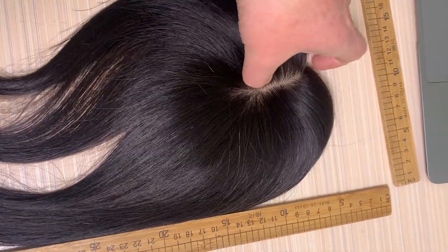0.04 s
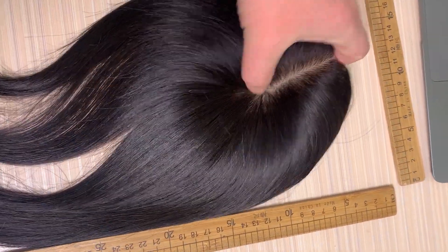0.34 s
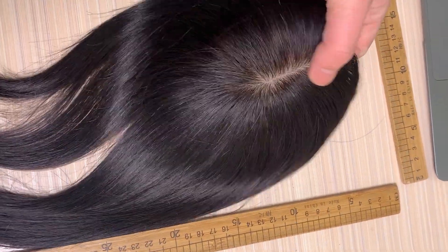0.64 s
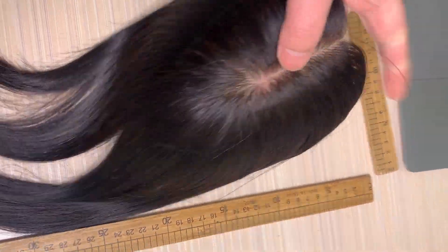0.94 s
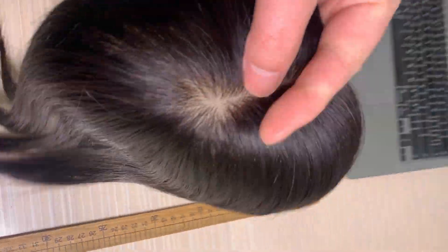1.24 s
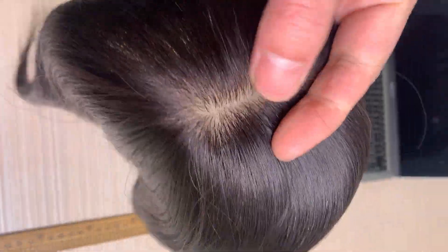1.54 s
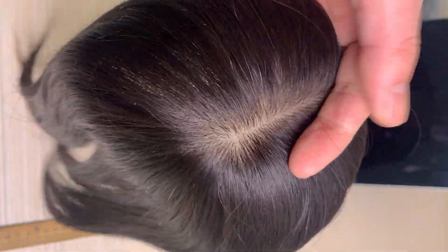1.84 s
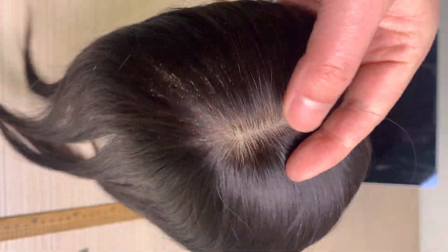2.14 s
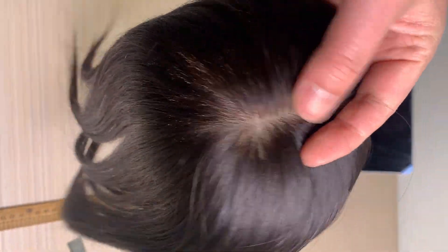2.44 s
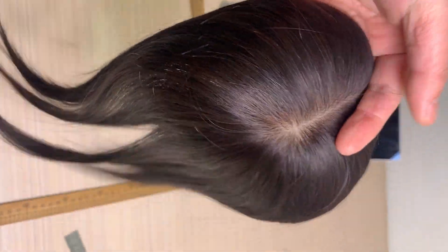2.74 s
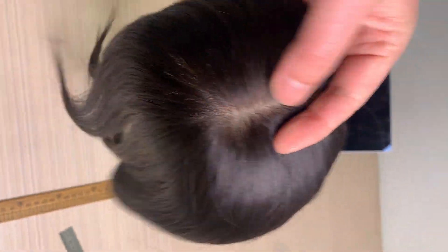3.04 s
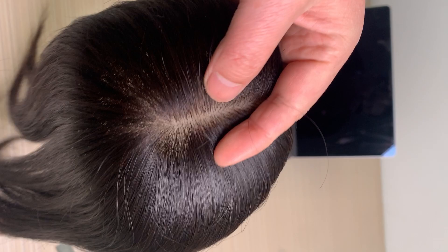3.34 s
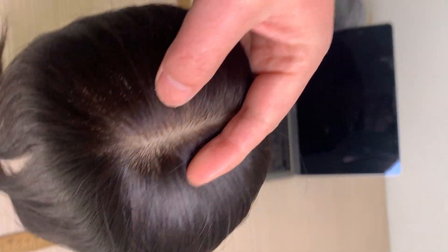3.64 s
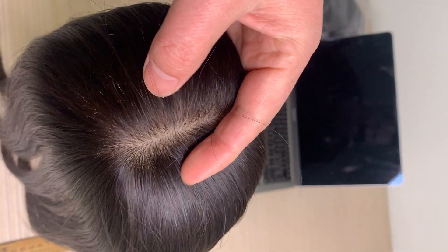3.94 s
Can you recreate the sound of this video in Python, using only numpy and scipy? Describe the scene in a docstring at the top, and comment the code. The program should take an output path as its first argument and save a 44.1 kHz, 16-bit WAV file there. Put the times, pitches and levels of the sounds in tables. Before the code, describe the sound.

A hair piece rustles softly close to the microphone over low room rumble. Its stiff cap scuffs and taps off a desk in the first 0.4 seconds. Strands then slide with a faint swish, tiny ticks and a fine hiss on the left, strongest near 2.4 seconds. Dull handling bumps on the microphone recur throughout, clustering around 2.9 seconds, and one clear, low knock lands at 3.7 seconds.

```python
"""A hair piece handled close to the stereo microphones of a hand-held camera in a quiet room.
First its stiff cap scuffs and taps as it is lifted off a desk. Then it is turned in one hand: the
strands slide with a soft swish and a fine sheen on the left, and a few snap faintly. The swish is
strongest near 2.4 s. The hand that holds the camera bumps the case softly along the way,
and knocks it once clearly at 3.7 s."""
import sys
import numpy as np
from scipy import signal
from scipy.fft import rfft, irfft
from scipy.io import wavfile
from scipy.ndimage import uniform_filter1d

SR = 44100
rng = np.random.default_rng(int(sys.argv[2]) if len(sys.argv) > 2 else 0)


def wav_record(signal):
    """Record a signal, one row per channel, as 16-bit PCM in the file named by sys.argv[1]."""
    frames = np.transpose(np.atleast_2d(signal))
    bounded = np.clip(frames, -1, 1)
    # unit amplitude maps onto the largest positive 16-bit level
    quanta = np.round(bounded * 32767).astype(np.int16)
    wavfile.write(sys.argv[1], SR, quanta)


N = 176400

# strands sliding close to the microphones (time [s], relative level [dB])
SWISH_LEVEL = [(0, -85), (.25, -85), (.37, -80.5), (.48, -77), (.65, -77), (.71, -89), (.82, -83),
               (.96, -74), (1.1, -75), (1.35, -73.5), (1.55, -75), (1.7, -76), (2.0, -78), (2.2, -80),
               (2.38, -68), (2.47, -75.5), (2.56, -77), (2.75, -88.5), (2.93, -88), (3.02, -89),
               (3.15, -81.5), (3.21, -77.5), (3.35, -82.5), (3.7, -82), (3.86, -75), (4, -81.5)]
# their soft swish (frequency [Hz], gain [dB])
SWISH_SPECTRUM = [(100, -19), (500, 6), (1000, 4.5), (1450, 2), (1950, 2), (2500, -2.5), (3600, -10.5),
                  (5000, -18), (7000, -18), (9000, -27), (12000, -21), (16000, -27)]
# quick strokes of the hair (time [s], relative level [dB])
STROKE_LEVEL = [(0, -100), (.25, -95), (.3, -78.5), (.4, -96), (.64, -77.5), (.71, -100), (.97, -80.5),
                (1.15, -80.5), (1.35, -76), (1.55, -77.5), (1.7, -91), (2.2, -90.5), (2.3, -82),
                (2.38, -71), (2.47, -80), (2.56, -88), (2.92, -100), (3.0, -83.5), (3.25, -84.5),
                (3.7, -81.5), (4, -99)]
# their brighter swish (frequency [Hz], gain [dB])
STROKE_SPECTRUM = [(100, -18), (1500, -6), (2800, 2), (3700, 3), (4800, -3.5), (5500, -11.5), (6400, -9),
                   (7500, -37), (16000, -30)]
# hair nearest the left microphone (time [s], relative level [dB])
SHEEN_LEVEL = [(0.0, -83), (0.05, -96), (0.24, -94), (0.27, -82.5), (0.38, -84.5), (0.65, -76.5),
               (0.73, -90), (1.02, -73.5), (1.38, -78), (1.79, -76.5), (1.85, -82), (2.64, -84),
               (2.71, -95), (2.81, -88), (2.86, -92), (3.15, -77), (3.3, -82.5), (3.31, -87), (3.32, -79.5),
               (3.75, -77.5), (3.79, -88), (4.0, -88)]
# its fine hiss (frequency [Hz], gain [dB])
SHEEN_SPECTRUM = [(20, -72), (7750, -50), (8030, 6), (8600, 2.5), (10000, -2), (11000, -9), (12000, -27),
                  (15000, -31)]
# a fingertip across the strands (time [s], length [s], level [dB])
FINGER_DRAGS = [(0.427, 0.11, -76.5), (.93, 0.15, -77), (1.058, 0.13, -75.5), (3.17, 0.088, -75.5),
                (3.317, 0.059, -76)]
# its coarse scrape (frequency [Hz], gain [dB])
DRAG_SPECTRUM = [(100, -30), (800, -20), (1150, 1), (1500, -7), (1900, 1), (2600, -2), (3400, -13),
                 (6000, -21), (16000, -43)]
# strands snapping (time [s], peak [dB], centre [Hz], width [octaves], decay [s], left minus right [dB])
STRAND_SNAPS = [(0.2718, -61.5, 4900, 0.16, 0.0036, -5), (.284, -67, 5100, 0.2, .004, 0),
                (.275, -66, 10000, .35, .012, 2), (1.3214, -63, 5040, 0.17, 0.004, -7),
                (1.334, -70, 5200, .16, .004, -9), (1.672, -63.5, 9500, 0.19, .005, 11),
                (2.368, -67, 4840, 0.13, .008, -14), (2.4502, -46.5, 1250, .36, .0025, 1),
                (3.1712, -53.5, 1920, 0.27, 0.0032, 1), (3.1714, -63, 4200, 0.67, 0.0033, -2),
                (3.3107, -62, 9500, .2, .004, 9), (3.3618, -63, 4000, 1, 0.003, 2),
                (3.407, -63, 4000, 0.99, 0.0023, 4), (3.708, -61, 4850, 0.67, 0.016, 4)]

# the hand rubbing the cap of the hair piece (time [s], relative level [dB])
RUB_LEVEL = [(0, -69.5), (.31, -77.5), (.37, -65), (.46, -84), (.7, -85.5), (.85, -70), (1.05, -68.5),
             (1.31, -63.5), (1.45, -67), (1.55, -78), (1.83, -62.5), (2.05, -67), (2.26, -63), (2.5, -65.5),
             (2.7, -76), (2.86, -81.5), (3.02, -68.5), (3.12, -81), (3.22, -72), (3.38, -70.5),
             (3.58, -83.5), (3.8, -72), (4, -72.5)]
# its dull rustle (frequency [Hz], gain [dB])
RUB_SPECTRUM = [(30, -25), (120, -5.5), (235, -6), (290, 3), (335, 2.5), (380, -4.5), (480, -10),
                (620, -11.5), (730, -13), (860, -16.5), (1100, -20.5), (1600, -29), (4000, -66),
                (16000, -86)]
# the cap scuffing on the desk and in the hand (time [s], level [dB], decay [s])
CAP_SCUFFS = [(0.033, -60, 0.013), (0.1056, -52.5, 0.017), (0.138, -55, 0.032), (.339, -58, 0.024),
              (2.378, -59, .06)]
# its hollow scrape (frequency [Hz], gain [dB])
SCUFF_SPECTRUM = [(40, -15), (200, 4), (360, -1.5), (460, -14), (560, 0.5), (630, -3.5), (705, 7.5),
                  (850, -14), (980, -11), (1300, -19.5), (1800, -18.5), (2500, -27), (5000, -39),
                  (16000, -56)]
# the cap tapping desk and fingers (time [s], relative level [dB], upper edge [Hz])
CAP_TAPS = [(0.048, -55.5, 1000), (.065, -52, 680), (.2735, -54.5, 1900), (.284, -57.5, 1300),
            (1.322, -54.5, 1000), (2.896, -61, 800), (2.972, -41.5, 580)]
# resonances of the cap (frequency [Hz], gain [dB], decay [s])
CAP_RESONANCES = [(560, 0.5, 0.004), (690, -2.5, 0.0043), (950, -4, .003), (1840, -8, .002)]

# the hand bumping the camera case (time [s], peak [dB], upper edge [Hz], tilt [dB per octave])
CASE_BUMPS = [(0.0512, -40, 390, 1.5), (0.1388, -45.5, 201, 3.5), (0.154, -49, 130, -9.5),
              (0.214, -46, 296, -1.5), (0.272, -55, 200, -3), (0.337, -45, 500, 0.5),
              (0.413, -52.5, 200, -1), (0.487, -50.5, 218, 1.5), (0.6, -49, 200, -0.5),
              (.745, -55.5, 220, 0), (0.858, -51, 120, -6), (0.969, -50.5, 110, -11), (1.21, -50, 120, -5),
              (1.331, -42.5, 130, -9), (1.465, -53, 100, -5), (1.571, -43.5, 190, -3),
              (1.6885, -42, 180, -1.5), (1.925, -43, 300, -2), (1.947, -47, 110, 2),
              (2.1867, -48.5, 99, -8), (2.3936, -42.5, 250, -2), (2.514, -51.5, 300, 1.5),
              (2.55, -49.5, 102, 6), (2.8066, -50.5, 110, -8), (2.8997, -40, 170, 0),
              (2.923, -36.5, 470, -1), (2.97, -37, 880, 3.5), (3.1728, -45, 800, 1), (3.184, -51, 110, -9)]
# the case under a soft touch (frequency [Hz], gain [dB])
BUMP_SPECTRUM = [(12, -54), (30, -27), (50, 2), (72, 1), (105, -2.5), (200, -7.5), (300, -20), (500, -20.5),
                 (750, -29.5), (1050, -33), (1400, -41), (1900, -36), (3000, -55), (15000, -84)]
# the case under a hard blow (frequency [Hz], gain [dB])
KNOCK_SPECTRUM = [(12, -36), (30, -13), (50, 1), (72, 5), (105, 1), (200, -9.5), (300, -19), (470, -19),
                  (640, -33), (780, -19.5), (950, -26.5), (1040, -25), (1420, -50), (1850, -45.5),
                  (2400, -58), (3000, -54), (3600, -67), (6000, -67), (9000, -95), (15000, -99)]
# left microphone ahead of right for the knock (frequency [Hz], phase [rad])
KNOCK_PHASE = [(350, 0), (480, 0.35), (620, -0.1), (900, 1.87), (1300, 2), (1700, 4.5), (2500, 6),
               (3100, 8)]
# tremor of the grip on the camera (time [s], level [dB])
GRIP_LEVEL = [(0, -55), (.4, -65), (.62, -58.5), (.72, -68.5), (1.0, -54), (1.3, -57.5), (1.53, -62.5),
              (1.9, -55), (2.3, -60), (2.7, -67), (2.95, -56), (3.1, -74), (3.45, -75.5), (3.65, -84),
              (4, -64.5)]
# its rumble (frequency [Hz], gain [dB])
GRIP_SPECTRUM = [(10, -65), (28, -19.5), (50, 2), (75, -0.5), (120, -6.5), (200, -15.5), (400, -65),
                 (16000, -100)]

# the still room (frequency [Hz], gain [dB])
ROOM_SPECTRUM = [(15, 32.5), (50, 35.5), (130, 22.5), (300, 18), (500, 13), (1000, 3), (1400, 4.5),
                 (1800, 8.5), (2300, 2), (4500, 4), (7700, -0.5), (8200, 2.5), (10000, -0.5), (12000, 1.5),
                 (15500, -5.5)]
# likeness of the two microphones (frequency [Hz], correlation [-1 to 1])
MIC_LIKENESS = [(20, 0.97), (150, 0.98), (300, 0.68), (450, 0.85), (650, 0.24), (950, -0.48), (1400, 0.035),
                (2000, 0.24), (3000, -0.2), (6000, 0.16), (10000, 0.51), (14000, 0.52)]
# left microphone ahead of right (frequency [Hz], phase [rad])
MIC_PHASE = [(40, 0.5), (160, 0.59), (215, 0), (300, -0.48), (450, -1.13), (650, .2), (1500, 0.26)]


def strand_swish():
    """Close up, strands slide over each other; quick strokes add a brighter swish."""
    slide = friction(SWISH_SPECTRUM, slips_per_s=4000, spread_db=1.5, clump_db=0.5, clump_hz=34.4)
    slide = patchy(slide, depth_db=2.5) * amp(level(SWISH_LEVEL) + 3.5)
    stroke = friction(STROKE_SPECTRUM, slips_per_s=9000, spread_db=0.2, clump_db=0, clump_hz=35)
    stroke = patchy(stroke, depth_db=3) * amp(level(STROKE_LEVEL) + 1.5)
    return slide + stroke


def strand_sheen(right_db=-13):
    """Fine hiss of hair sliding right by the left microphone."""
    hiss = friction(SHEEN_SPECTRUM, slips_per_s=12000, spread_db=-1, clump_db=0.8, clump_hz=35)
    hiss = patchy(hiss, depth_db=1.5) * amp(level(SHEEN_LEVEL) + 4.5)
    return hiss * amp([[0], [right_db]])


def finger_drags():
    """Short coarse scrapes swell and fade as a fingertip crosses single hairs."""
    t, pressure = np.arange(N) / SR, np.zeros(N)
    for start_s, length_s, db in FINGER_DRAGS:
        pressure += amp(db) * np.sin(np.pi * np.clip((t - start_s) / length_s, 0, 1))
    return pressure * friction(DRAG_SPECTRUM, slips_per_s=1300, spread_db=0, clump_db=3, clump_hz=50)


def strand_snaps():
    """Strands catch and let go, each with a short dying tick in one band."""
    out, hz, margin_s = np.zeros((2, N)), np.fft.rfftfreq(4096, 1 / SR), 0.005
    age = np.arange(4096) / SR - margin_s
    for start_s, db, centre_hz, octaves, decay_s, pan_db in STRAND_SNAPS:
        band = np.exp(-0.5 * (np.log2((hz + 1) / centre_hz) / octaves) ** 2)
        burst = rng.standard_normal((3, 4096)) * (age >= 0) * np.exp(-abs(age) / decay_s)
        tick = irfft(rfft(burst[:2] + burst[2]) * band)  # the third burst reaches both microphones
        tick /= abs(tick).max(axis=1, keepdims=True)
        add(out, start_s - margin_s, tick * amp([[db + pan_db / 2], [db - pan_db / 2]]))
    return out


def cap_rub():
    """The hand rubs the cap of the hair piece with a dull rustle."""
    rustle = friction(RUB_SPECTRUM, slips_per_s=2500, spread_db=-1, clump_db=1.5, clump_hz=25.1)
    return rustle * amp(level(RUB_LEVEL) + 2.5)


def cap_scuffs(attack_s=0.0022):
    """The cap scrapes on desk and hand: hollow scuffs that start at once and die away."""
    t, pressure = np.arange(N) / SR, np.zeros(N)
    for start_s, db, decay_s in CAP_SCUFFS:
        age = np.maximum(t - start_s, 0)
        pressure += amp(db) * np.minimum(age / attack_s, 1) * np.exp(-age / decay_s)
    return pressure * friction(SCUFF_SPECTRUM, slips_per_s=4000, spread_db=0.5, clump_db=1, clump_hz=80)


def cap_taps():
    """Each tap rings the stiff, hollow cap for a few milliseconds, dead centre."""
    out, t = np.zeros((2, N)), np.arange(2048) / SR
    for start_s, db, edge_hz in CAP_TAPS:
        for hz, mode_db, decay_s in CAP_RESONANCES:
            gain = amp(db + mode_db) * softness(hz, edge_hz)
            envelope = np.exp(-t / decay_s) * (1 - np.exp(-t * hz))
            add(out, start_s, gain * envelope * np.sin(2 * np.pi * hz * t))
    return out


def case_bumps():
    """Handling noise: soft, dull touches of the hand on the camera, and one hard knock."""
    out = np.zeros((2, N))
    for start_s, db, edge_hz, tilt_db in CASE_BUMPS:
        add(out, *thump(start_s, db, BUMP_SPECTRUM, MIC_PHASE,
                        bass_lag_s=0.0872, edge_hz=edge_hz, tilt_db=tilt_db))
    knock = thump(start_s=3.7161, peak_db=-14.5, spectrum=KNOCK_SPECTRUM, phase=KNOCK_PHASE,
                  bass_lag_s=0.11)
    add(out, *knock)
    return out


def thump(start_s, peak_db, spectrum, phase, bass_lag_s, edge_hz=SR, tilt_db=0):
    """Time and sound of a blow through the case: treble first, bass last, so it falls in pitch."""
    hz, margin_s = np.fft.rfftfreq(8192, 1 / SR), 0.005
    knee_hz = 17.94  # the lag has halved here
    lag_cycles = bass_lag_s * knee_hz * np.log1p(hz / knee_hz) + margin_s * hz
    gain = amp(read(spectrum, hz) + tilt_db * np.log2(hz + 1)) * softness(hz, edge_hz)
    response = gain * np.exp(-2j * np.pi * lag_cycles) * mic_turn(phase, hz)
    wave = np.fft.ifft(response, 8192)[:, :6000]
    return start_s - margin_s, amp(peak_db) * wave.real / abs(wave).max()


def grip_rumble():
    """The hand trembles around the camera and the microphones pick up a low rumble."""
    tremor = friction(GRIP_SPECTRUM, slips_per_s=1300, spread_db=3.5, clump_db=2, clump_hz=20)
    return tremor * amp(level(GRIP_LEVEL))


def room_tone(level_db=-70.5):
    """Steady rumble and hiss of the room, behind everything."""
    return at_microphones(rng.standard_normal((2, N)), ROOM_SPECTRUM) * amp(level_db)


def friction(spectrum, slips_per_s, spread_db, clump_db, clump_hz):
    """A dense stream of tiny slips of uneven size that come in clumps."""
    size = amp(spread_db * np.minimum(rng.exponential(1, N), 5))
    slips = rng.standard_normal((2, N)) * size * (rng.random(N) < slips_per_s / SR)
    return at_microphones(slips * amp(clump_db * wander(clump_hz)), spectrum)


def patchy(sound, depth_db, patch_s=0.055, patch_hz=500):
    """Locks of hair come and go, each lifting its own band for a moment."""
    frames = signal.stft(sound, nperseg=512)[2]
    patches = rng.standard_normal(frames.shape[1:])
    patches = uniform_filter1d(patches, round(patch_hz * 512 / SR), axis=0)
    patches = uniform_filter1d(patches, round(patch_s * SR / 256), axis=1)
    frames *= amp(depth_db * unit_rms(patches))
    return unit_rms(signal.istft(frames, nperseg=512)[1][:, :N])


def at_microphones(noise, spectrum):
    """Gives two noises a spectrum and the likeness and phase of the microphone pair."""
    hz = np.fft.rfftfreq(N, 1 / SR)
    first, second = rfft(noise)
    likeness = read(MIC_LIKENESS, hz)
    mid, side = first * np.sqrt(1 + likeness), second * np.sqrt(1 - likeness)
    pair = np.array([mid + side, mid - side])
    return unit_rms(irfft(pair * amp(read(spectrum, hz)) * mic_turn(MIC_PHASE, hz), N))


def mic_turn(phase, hz):
    """Splits a phase lead between the left and right microphones."""
    return np.exp(0.5j * np.array([[1], [-1]]) * read(phase, hz))


def softness(hz, edge_hz):
    """Treble roll-off of a contact: the softer the touch, the lower the edge."""
    return 1 / np.sqrt(1 + (hz / edge_hz) ** 10)


def wander(rate_hz):
    """Smooth random drift with an rms of 1."""
    hz = np.fft.rfftfreq(N, 1 / SR)
    return unit_rms(irfft(rfft(rng.standard_normal(N)) / (1 + (hz / rate_hz) ** 4), N))


def amp(db):
    """Decibels to gain."""
    return 10 ** (np.asarray(db) / 20)


def unit_rms(x):
    """Scales to an rms of 1."""
    return x / np.sqrt(np.mean(x ** 2) + 1e-30)


def read(points, hz):
    """Reads a curve on a log-frequency axis."""
    point_hz, value = np.transpose(points)
    return np.interp(np.log(hz + 1), np.log(point_hz + 1), value)


def level(points):
    """Reads a level curve at every sample."""
    return np.interp(np.arange(N) / SR, *np.transpose(points))


def add(mix, start_s, sound):
    """Mixes a sound in at its start time."""
    part = mix[:, max(round(start_s * SR), 0):][:, :sound.shape[-1]]
    part += sound[..., :part.shape[1]]


def scene():
    """The hair piece up close, handling noise on the camera, and the room behind."""
    hair_piece = cap_rub() + strand_swish() + strand_sheen() + finger_drags()
    contacts = cap_scuffs() + cap_taps() + strand_snaps()
    return hair_piece + contacts + case_bumps() + grip_rumble() + room_tone()


def record(dry, low_cut_hz=24, high_cut_hz=15500):
    """The low cut and the band limit of the recorder."""
    hz = np.fft.rfftfreq(2 * N, 1 / SR)
    low_cut = 1 / np.sqrt(1 + (low_cut_hz / (hz + 1)) ** 8)
    trimmed = irfft(rfft(dry, 2 * N) * low_cut)[:, :N]
    band_limit = signal.firwin(511, high_cut_hz, window=("kaiser", 9), fs=SR)
    return signal.oaconvolve(trimmed, band_limit[None], "same")


dry = scene()
out = record(dry)
wav_record(out)
```